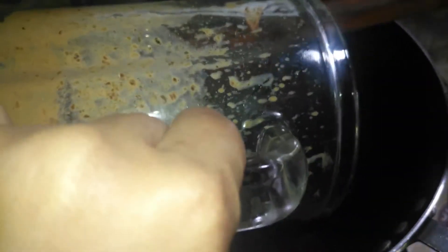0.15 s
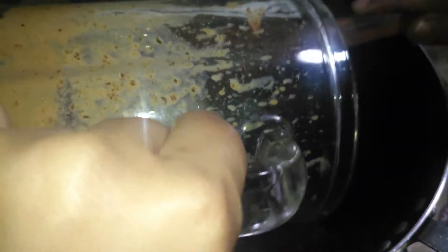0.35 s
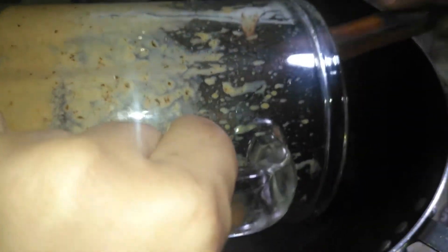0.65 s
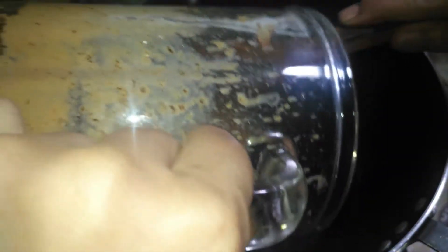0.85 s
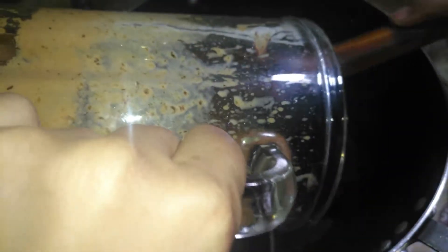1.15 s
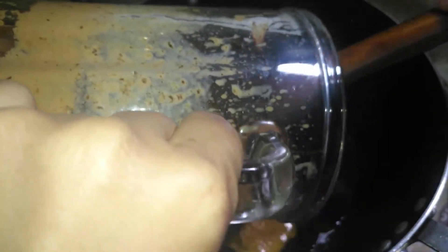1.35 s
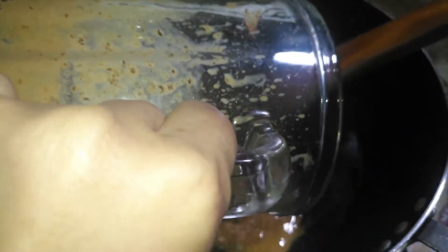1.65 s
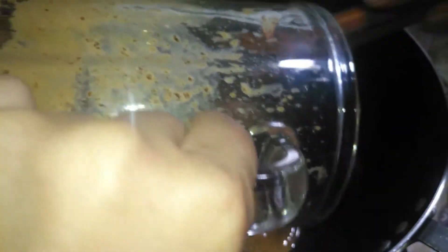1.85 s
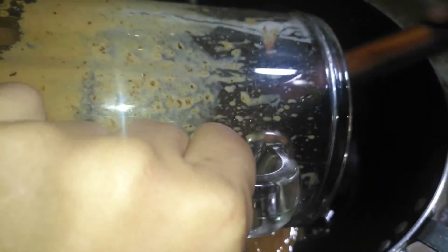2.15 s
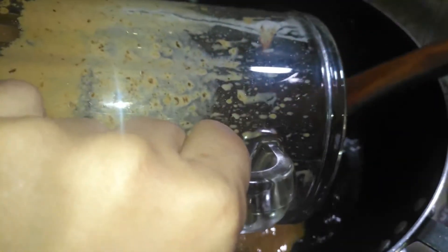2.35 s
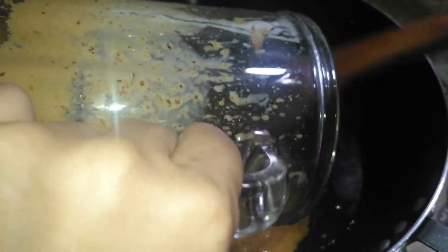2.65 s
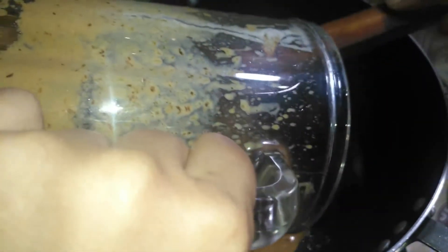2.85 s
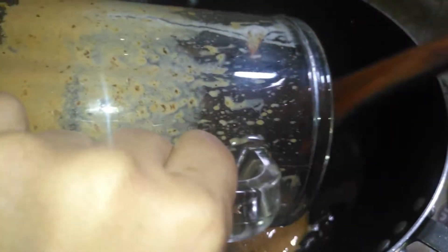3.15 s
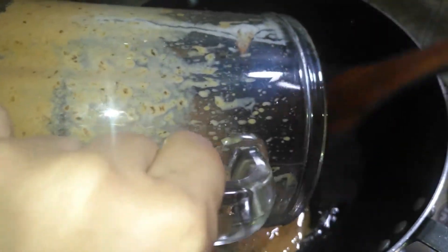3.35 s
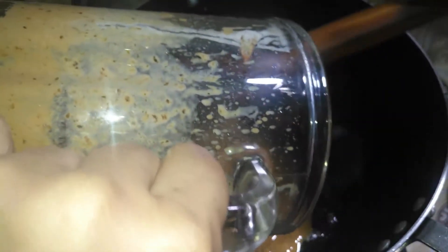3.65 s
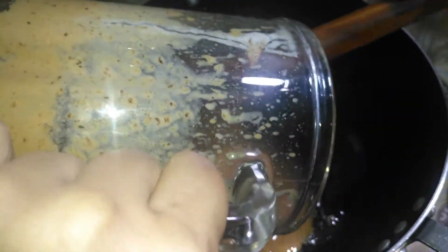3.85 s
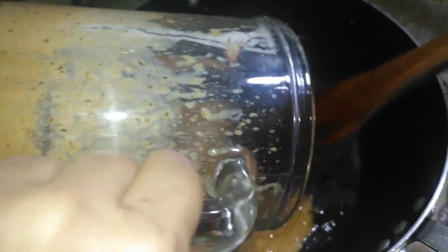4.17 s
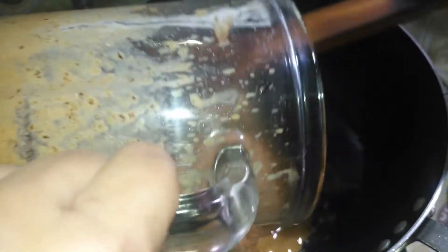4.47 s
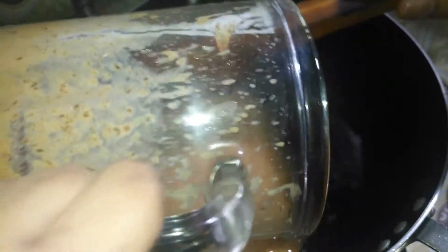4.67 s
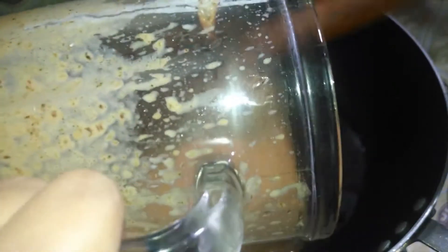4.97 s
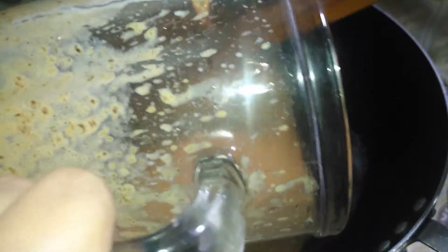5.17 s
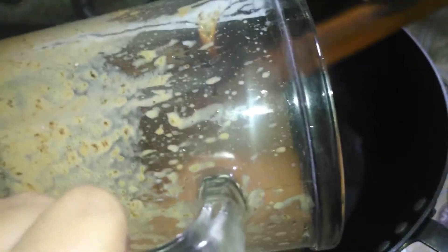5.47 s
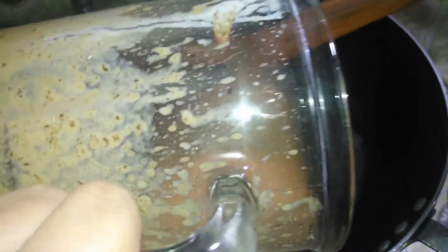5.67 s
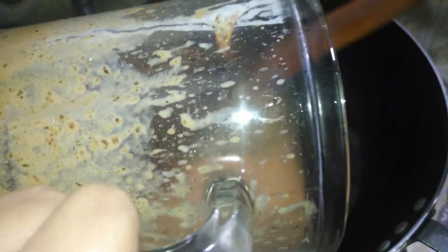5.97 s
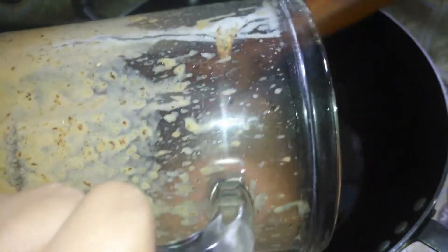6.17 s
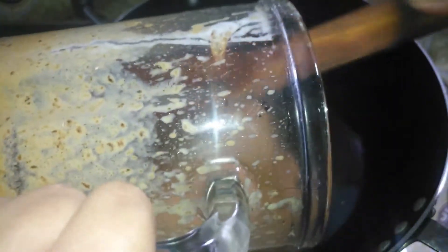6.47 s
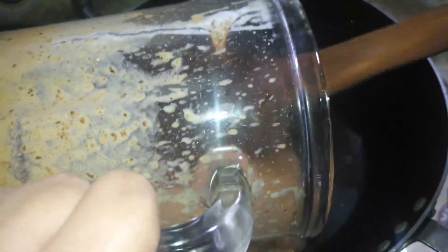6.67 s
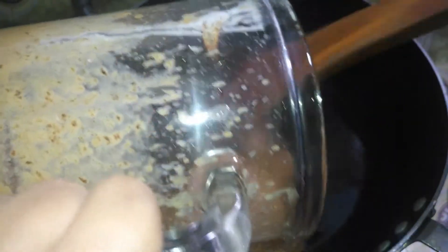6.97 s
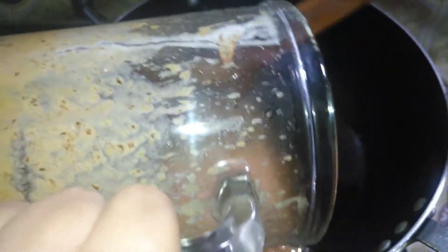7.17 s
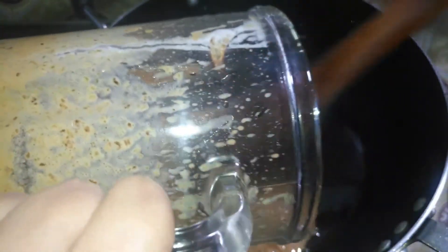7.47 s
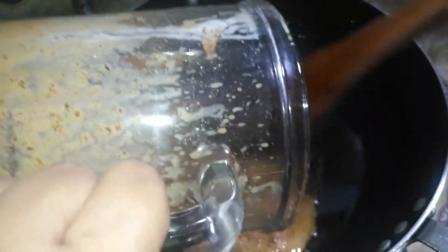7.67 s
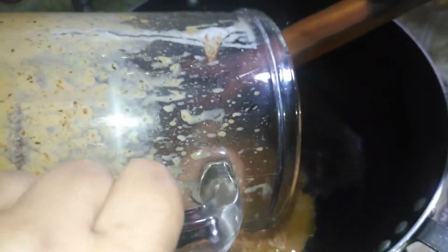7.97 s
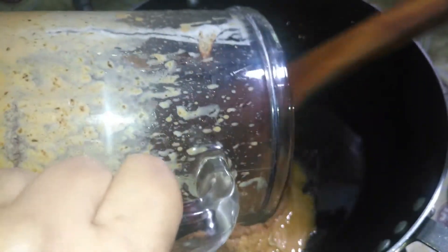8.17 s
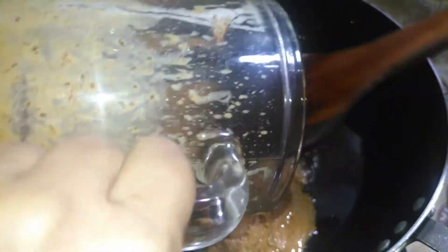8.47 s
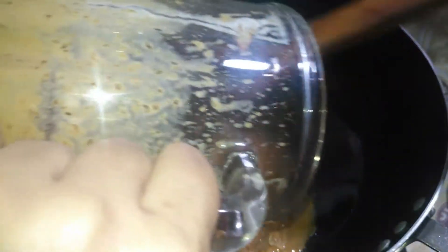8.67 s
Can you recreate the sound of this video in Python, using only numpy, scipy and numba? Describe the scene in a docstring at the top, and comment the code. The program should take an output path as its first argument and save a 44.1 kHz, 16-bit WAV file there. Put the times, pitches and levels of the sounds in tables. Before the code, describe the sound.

A handheld stereo phone, close to the jar and pan, picks up dull, damped glass knocks from a wooden spatula. A bright clack opens, a hollow knock follows, then it is sparse, mostly fine crackling spits and faint frying. Later the taps and low rubbing shudders come more often, peaking in a loud rattle past the middle. Sharp oil pops punctuate them, with short reflections from hard kitchen surfaces and a faint background hum.

```python
"""A small hard kitchen hums faintly under a hot pan: steady coloured noise and tones, with sizzle made of tiny noise bursts.
Almost at once a wooden spatula rubs and knocks inside a tilted glass jar, pushing thick paste into the pan.
Rubs are low shudders and stirred air; knocks ring the jar's air and walls as fading sine waves.
From 0.16 s drops spit in the oil as short filtered noise pops. Knocks bunch up around 6.1 to 6.5 s,
and a last group comes near 8.6 s. Echoes of the knocks and spits follow each one."""
import sys
import numpy as np
from scipy import signal
from scipy.fft import rfft, irfft
from scipy.io import wavfile
from scipy.ndimage import uniform_filter1d
from numba import njit

SR = 44100
rng = np.random.default_rng(int(sys.argv[2]) if len(sys.argv) > 2 else 0)


def to_wav(s):
    """Save 16-bit WAV."""
    ch = np.atleast_2d(s).T  # columns
    pcm = np.round(np.clip(ch, -1, 1) * 32767)  # PCM
    wavfile.write(sys.argv[1], SR, pcm.astype(np.int16))


N = 388962

# steady kitchen background, relative spectrum: f/Hz, level/dB
KITCHEN_COLOUR = [(20, -18), (50, -9), (102, 2), (190, -8.5), (300, -10.5), (400, -5.5), (490, -14.5),
                  (690, -1.5), (800, -12), (1470, -15.5), (2100, -17.5), (2700, -20.5), (5000, -29.5),
                  (8000, -41), (14000, -41)]
# how alike left and right are in the background: f/Hz, correlation (0 to 1)
ALIKE = [(60, 1), (300, 0.6), (700, .05), (2200, 0.56), (4000, .02)]
# appliance tones: f/Hz, level/dB (rms)
HUM = [(247.6, -71.5), (484.5, -84.5), (1405, -93.5), (1647, -91), (2046, -87), (2143, -95.5),
       (2245, -91.5), (2293, -91), (2347, -99.5)]
# fresh paste meets the oil and fries: t/s, length/s, level/dB
FRYING = [(0.0, 0.076, -73), (0.236, 0.027, -72), (1.55, 0.92, -72.5), (2.875, 0.67, -86.5),
          (4.733, 0.64, -81.5), (5.855, 0.033, -75), (6.437, 0.1, -74), (6.997, 0.15, -74),
          (7.421, 0.079, -81.5), (8.37, .3, -85.5), (8.746, 0.089, -78.5)]
# relative spectrum of the sizzle: f/Hz, level/dB
SIZZLE_COLOUR = [(880, -36.5), (1500, -1), (2120, 1), (2700, -8), (4390, -12.5), (5200, 2), (6390, -1),
                 (11600, -20.5), (14000, -38)]
# strokes of the spatula along the glass:
# t/s, length/s, shudder level/dB, shudder f/Hz, stirred air level/dB, deep sway level/dB
STROKES = [(0.026, 0.059, -61, 95.94, -67.5, -61.5), (0.36, 0.032, -83.5, 100.2, -66, -92),
           (0.661, .12, -80.5, 115.2, -53, -88), (1.308, 0.024, -69, 110.5, -87, -70.5),
           (1.598, 0.14, -57.5, 66.47, -94, -65), (1.796, .04, -48.5, 66.47, -77, -65),
           (2.148, .2, -71.5, 98.4, -104, -80), (3.545, .06, -71.5, 98, -82, -72),
           (3.862, .1, -69, 81.62, -93, -73), (4.057, 0.12, -68.5, 79.8, -72.5, -89),
           (4.314, .06, -63, 86.9, -80, -88), (4.6, .05, -68.5, 98.44, -88, -100),
           (4.777, 0.068, -63.5, 101.4, -76, -86), (5.03, 0.13, -71, 97.45, -82, -78),
           (5.377, .04, -62.5, 98.3, -93, -86), (5.55, .07, -62.5, 96.8, -80, -71),
           (5.75, 0.11, -64.5, 104.2, -78, -87), (5.929, 0.12, -60, 90.18, -82, -80),
           (6.184, 0.25, -47.5, 78.25, -79.5, -75.5), (6.476, 0.043, -56, 77.4, -51.5, -91),
           (6.663, .13, -57, 82.67, -72.5, -77), (6.831, 0.029, -54.5, 109.5, -79, -80.5),
           (6.967, 0.071, -59, 104.6, -82, -87.5), (7.192, 0.039, -57.5, 106.5, -72, -86),
           (7.391, 0.11, -52.5, 112.7, -98, -84), (7.651, 0.042, -55, 110.5, -77, -82),
           (7.866, 0.067, -59.5, 106.9, -78, -84), (8.066, 0.038, -59.5, 113.7, -75, -80),
           (8.38, 0.022, -71.5, 118.2, -71, -88), (8.515, 0.013, -47.5, 108.6, -61, -52.5),
           (8.634, 0.13, -48.5, 111.3, -51, -49.5)]
# the held jar between strokes: shudder level/dB, shudder f/Hz, stirred air level/dB, deep sway level/dB
HELD_JAR = (-80.5, 105, -89, -93)
# spatula blows on the jar: t/s, then for air, low wall and high wall in turn favoured f/Hz and level/dB,
# top wall level/dB, ring of low and high walls as a share of their t60 (at least 0.1 is used),
# left minus right level/dB
KNOCKS = [(0.026, 526, -16.5, 1170, -14.5, 1973, -12.5, -12.5, 0.46, 1.5),
          (0.047, 547, -25.5, 1260, -31, 2260, -41.5, -45.5, 0.72, -11.5),
          (0.156, 576, -38, 1080, -76, 1820, -42.5, -46, 0.26, 7),
          (0.174, 400, -41, 1390, -60, 2230, -63.5, -65, 0.35, 6),
          (0.247, 443, -28, 1250, -23.5, 1736, -28.5, -28.5, 0.24, 1.5),
          (0.265, 543, -28.5, 1500, -46, 1570, -61, -69, 0.4, -7.5),
          (0.644, 557, -51, 1330, -59.5, 2130, -59, -48, 0.94, 7.5),
          (0.7, 545, -43, 1290, -70, 1890, -73.5, -70, .37, 8),
          (0.823, 509, -18, 1000, -70, 1550, -71, -63, .46, 1.5),
          (1.607, 458, -47.5, 1160, -80, 1680, -81, -64, .4, 5),
          (1.824, 508, -34, 1130, -35.5, 1780, -57, -70, 0.37, 6),
          (2.736, 463, -43, 1110, -56, 1860, -54, -55.5, 0.55, 6),
          (3.628, 464, -35.5, 1040, -43, 2050, -63, -75, 0.26, 5.5),
          (4.04, 450, -30, 1240, -43, 1630, -56, -57, 0.61, 3),
          (4.112, 530, -59, 1280, -46, 1650, -48, -45.5, 0.42, 1),
          (4.128, 490, -55, 1400, -58, 2200, -57, -52, 0.48, 8),
          (4.142, 490, -69, 1190, -59, 1900, -55.5, -59, 0.44, -1),
          (4.538, 506, -40.5, 1440, -61, 1660, -60.5, -68, 0.39, 3.5),
          (4.569, 477, -47.5, 1350, -50.5, 1620, -49, -59, 0.5, -7),
          (4.954, 532, -26, 1360, -32.5, 1690, -26, -34.5, 0.58, 1.5),
          (5.16, 491, -24.5, 1290, -22, 1560, -65, -62.5, 0.2, 4.5),
          (5.241, 486, -28, 1430, -17, 2330, -26, -36, 0.18, 3),
          (5.667, 440, -38.5, 1350, -40, 1640, -38.5, -66, 0.24, 3),
          (5.717, 486, -30.5, 1280, -31.5, 1550, -41, -45.5, 0.44, -1.5),
          (5.824, 510, -33, 1130, -22, 2330, -24.5, -29.5, 0.19, 2.5),
          (6.104, 484, -40.5, 1230, -54.5, 1730, -68.5, -63.5, 0.35, 6),
          (6.179, 532, -43, 1350, -19, 1680, -27, -32.5, 0.16, -5.5),
          (6.189, 515, -48, 1280, -23, 1907, -23, -33.5, 0.21, 1.5),
          (6.215, 507, -28.5, 1230, -39, 1690, -40, -36, 0.94, 7),
          (6.414, 468, -37, 1120, -40, 1720, -38, -33.5, .48, 3),
          (6.423, 538, -20.5, 1000, -13.5, 2370, -24, -19, 0.4, 7),
          (6.442, 465, -21, 1270, -2.5, 1807, -5, -11.5, 0.34, 0),
          (6.486, 493, -32, 1210, -25.5, 1800, -32.5, -45.5, 0.94, 1),
          (6.507, 500, -50, 1247, -24, 1750, -48, -40, 1, -1),
          (6.799, 478, -36, 1340, -25, 1630, -31.5, -48, 0.73, -7.5),
          (7.104, 463, -23.5, 1130, -16.5, 1710, -21.5, -29, 0.34, 1),
          (7.709, 459, -45.5, 1240, -55.5, 1610, -77, -73.5, 0.48, 6),
          (7.871, 459, -39.5, 1030, -53.5, 2150, -77, -68, .4, 2.5),
          (8.099, 481, -50.5, 1020, -59, 2050, -71, -76, 0.31, 7.5),
          (8.508, 460, -29.5, 1350, -19, 2020, -33, -59, 0.38, -3.5),
          (8.66, 437, -21.5, 1140, -55, 1860, -29.5, -31, 0.3, 0.6),
          (8.681, 446, -25.5, 1220, -29.5, 1820, -35.5, -27, 0.63, 2),
          (8.702, 433.5, -28.5, 1250, -70, 1790, -40.5, -39.5, 0.5, -4.5)]
# ways the jar can ring, before the hand and paste shorten them: f/Hz, relative level/dB, t60/s
AIR_MODES = [(420, 5.5, 0.086), (461.8, 5, 0.11), (512, 2, 0.1), (535, 7.5, 0.055), (647, 3, 0.07)]  # air in the jar's mouth
LOW_WALL_MODES = [(994, 0.027, 0.057), (1136.6, 0, 0.046), (1167, 0.0025, 0.048), (1292.4, 0.0066, 0.1),
                  (1344.6, 0, 0.25), (1330, 0.0064, 0.055)]
HIGH_WALL_MODES = [(1527, 0.024, 0.14), (1639, 0.042, 0.097), (1830, 0.015, 0.081), (2060, 0.011, 0.054),
                   (2104, 0.028, 0.2), (2100, 0.005, .07), (2370, 0.023, 0.072)]
TOP_WALL_MODES = [(2668, 5.5, 0.076), (2920, 0.5, 0.084), (3274, 4, 0.11), (3930, 7, 0.12), (4150, 5, .03)]
# drops bursting in hot oil: t/s, peak level/dB, f/Hz, sharpness Q (at least 0.5 is used),
# starting level of the hiss against the burst/dB
SPITS = [(0.1553, -41.5, 3940, 0.59, -34), (0.6427, -54.5, 5300, 2, -12.5), (1.3162, -73, 5690, 4.1, -9),
         (1.482, -66, 7000, 0.56, -25), (1.55, -59, 5420, 2.1, 1), (1.6716, -57.5, 6600, 1.9, 3),
         (1.9136, -54.5, 5700, 2.7, -20), (1.953, -60.5, 6300, 0.86, -31), (1.9832, -57.5, 6500, 0.97, -34),
         (2.0643, -54, 5940, 2.6, -25.5), (2.2897, -55.5, 5900, 1.1, -12), (2.4672, -51.5, 5540, .88, -19),
         (2.667, -65, 5020, 2.4, -17), (2.8709, -63, 5000, 2, -19), (2.9487, -67, 10700, 2, -21),
         (2.9763, -66, 10900, 2.5, -18), (3.048, -58, 5700, 1.2, -17), (3.0894, -54.5, 3440, 0.7, -43.5),
         (3.201, -53.5, 4694, 1.9, -21), (3.242, -48, 6400, 2.3, -20), (3.3054, -46, 5950, 3, -31),
         (3.467, -53.5, 6800, 1.3, -18), (3.7768, -54.5, 7400, 1.14, -9.5),
         (3.8513, -50.5, 6910, 0.44, -45), (4.0396, -62.5, 6350, 1.2, -13), (4.1713, -56, 11670, 0.46, -53),
         (4.2134, -57.5, 3520, 1.6, -22), (4.4348, -61, 5300, 0.47, -15), (4.744, -37.5, 5700, 4.4, -26),
         (5.034, -65, 12450, 2.5, -21), (5.0509, -50.5, 9300, 3.4, -43), (5.1476, -48.5, 9000, 0.76, -36),
         (5.1752, -35.5, 5300, 2.3, -24), (5.3697, -66.5, 4570, 2.8, -25), (5.428, -44, 6400, 1.1, -36.5),
         (5.8222, -45, 3330, 2.3, -31), (5.937, -45.5, 5500, 0.96, -41.5),
         (6.4101, -39.5, 3365, 2.1, -27.5), (6.8386, -63.5, 7500, 1.4, -18),
         (6.9735, -43.5, 5520, 1.8, -29.5), (7.197, -63, 6055, 2.14, -25), (7.3262, -58.5, 7740, 0.94, -11),
         (7.4031, -33, 5630, 5.2, -25.5), (7.9708, -63, 5480, 2.6, -10), (8.0312, -62, 5440, 1.47, -25),
         (8.099, -54, 6180, 2.33, -41), (8.3299, -40, 3505, 1.24, -16.5), (8.6133, -59, 10400, 1.47, -12)]
# echo bands: f/Hz, t60/s, echo over direct sound/dB before the 4-fold (12 dB) boost in room()
ECHO_BANDS = [(283, 0.47, -21.5), (600, 0.13, -9.5), (1340, 0.14, -21.5), (2360, 0.48, -22.5),
              (5590, 0.12, -25), (11000, 0.29, -21.5)]

KITCHEN_DB = -71  # rms of the part shared by both channels, before its slow drift
FRY_RISE_DB_S, FRY_FALL_DB_S, SIMMER_DB = 295.5, 150.5, -99
STROKE_RISE_DB_S, STROKE_FALL_DB_S = 252.5, 204
AIR_RING, TOP_RING = 0.81, 0.2  # share of their t60 that the paste leaves to air and top wall modes
WANDER_RAD = 0.35  # size of the random phase steps, before smoothing
CRACK_DB, CRACK_S = -13, 0.0025  # noise before its filter, against the top wall level; fade time
SKID_DB, SKID_S = -1.5, 0.0029  # later contacts against the first; fade time
RATTLE_DB, RATTLE_S = -30, 0.028  # noise before its filter, against the force of the blow; fade time
HARD_RATTLE_DB = 11  # hard contacts, strong in the top modes, rattle more
SPIT_LEFT_DB, SPIT_LEFT_DB_PER_OCTAVE = 9.5, 2  # left minus right at 6300 Hz, growing with pitch
ECHO_WIDTH = 0.33  # unlike share of the echo
TOP_HZ = 14180  # upper limit of the phone


def undb(db):
    """Turns decibels into gain."""
    return 10 ** (np.asarray(db) / 20)


def unit(x):
    """Scales a signal to rms 1."""
    return x / np.sqrt(np.mean(x ** 2))


def along(table, hz):
    """Reads between (Hz, value) points, with pitch on a log scale."""
    f, value = np.transpose(table)
    return np.interp(np.log(np.maximum(hz, 1)), np.log(f), value)


def coloured(table):
    """Makes noise with a spectrum of (Hz, dB) points."""
    colour = undb(along(table, np.fft.rfftfreq(N, 1 / SR)))
    return irfft(rfft(rng.standard_normal(N)) * colour, N)


def walk(rate):
    """Makes a smooth random wander of rms 1 from about `rate` new values a second."""
    k = int(SR / rate)
    held = np.repeat(rng.standard_normal(N // k + 1), k)
    smooth = uniform_filter1d(uniform_filter1d(held, k), k)
    return unit(smooth[:N])


@njit
def svf(x, hz, q):
    """Band-pass filter whose centre may move; gain is 1 at the centre."""
    y, band, low = np.empty(len(x)), 0., 0.
    for i in range(len(x)):
        g = np.tan(np.pi * hz[i] / SR)
        v = (band + g * (x[i] - low)) / (1 + g * (g + 1 / q))
        band, low, y[i] = 2 * v - band, low + 2 * g * v, v / q
    return y


def add(out, s, sound, left_db):
    """Mixes a sound into both channels at time s; left_db is left minus right."""
    i = int(s * SR)
    n = min(sound.shape[-1], N - i)
    out[:, i:i + n] += sound[..., :n] * undb([[left_db / 2], [-left_db / 2]])


def swells(start_s, length_s, rise_db_s, fall_db_s):
    """One gain row per event, a value every 64 samples: a steady rise in dB, a hold, a steady fall."""
    t = np.arange(0, N, 64) / SR
    early = np.maximum(start_s[:, None] - t, 0)
    late = np.maximum(t - (start_s + length_s)[:, None], 0)
    return undb(-rise_db_s * early - fall_db_s * late)


def spread(x):
    """Fills in from one value every 64 samples to one per sample."""
    return np.interp(np.arange(N), 64 * np.arange(len(x)), x)


def kitchen():
    """Steady background noise plus appliance tones; the bass is alike left and right."""
    hz = np.fft.rfftfreq(N, 1 / SR)
    alike = np.clip(along(ALIKE, hz), 0, 1)
    mid = irfft(rfft(coloured(KITCHEN_COLOUR)) * np.sqrt(1 + alike), N)
    side = irfft(rfft(coloured(KITCHEN_COLOUR)) * np.sqrt(1 - alike), N)
    air = np.array([mid + side, mid - side]) * undb(KITCHEN_DB) / np.std(mid)
    t = np.arange(N) / SR
    tones = 0
    for f, db in HUM:
        level = np.sqrt(2) * undb(db + 0.3 * walk(2.9))
        tones = tones + level * np.sin(2 * np.pi * f * t + 0.6 * walk(39))
    return air * undb(0.9 * walk(1.0)) + tones


def sizzle():
    """Hundreds of tiny bursts a second of uneven size over a fine hiss, stronger on the left."""
    s, length, db = np.transpose(FRYING)
    frying = undb(db) @ swells(s, length, FRY_RISE_DB_S, FRY_FALL_DB_S)
    gain = spread(undb(SIMMER_DB) + frying)
    size = undb(2.0 * rng.exponential(size=N).clip(0, 4))
    size = size * (rng.random(N) < 400 / SR)  # about 400 bursts a second
    size = signal.lfilter([1], [1, -np.exp(-1 / (0.0016 * SR))], size)  # each fades over 1.6 ms
    strength = unit(size) + 1.5  # the constant part is the fine hiss
    colour = undb(along(SIZZLE_COLOUR, np.fft.rfftfreq(N, 1 / SR)))
    grains = [unit(irfft(rfft(strength * rng.standard_normal(N)) * colour, N)) for _ in range(2)]
    return np.array(grains) * gain * undb(2 * walk(36)) * undb([[3.5], [-3.5]])


def drag():
    """The blade sticks and slips: the held jar shudders low and the air inside is stirred."""
    s, length, low_db, pitch_hz, air_db, sway_db = np.transpose(STROKES)
    rest_low_db, rest_hz, rest_air_db, rest_sway_db = HELD_JAR
    press = swells(s, length, STROKE_RISE_DB_S, STROKE_FALL_DB_S)
    low = undb(rest_low_db) + undb(low_db) @ press
    stir = undb(rest_air_db) + undb(air_db) @ press
    sway = undb(rest_sway_db) + undb(sway_db) @ press

    # average pitch weighted by power, so the strongest stroke sets it
    rest_power, power = undb(2 * rest_low_db), undb(2 * low_db)
    pitch_sum = rest_power * rest_hz + power * pitch_hz @ press ** 2
    hz = spread(pitch_sum / (rest_power + power @ press ** 2))

    push = rng.standard_normal(N)
    steady = np.sqrt(2) * np.sin(2 * np.pi * np.cumsum(hz * (1 + 0.02 * walk(25))) / SR)
    ragged = unit(svf(svf(push, hz, 2.5), hz, 1.2))
    shudder = (steady + undb(-1.0) * ragged) * spread(low) * undb(1.5 * walk(10))
    deep = svf(svf(push[::-1].copy(), np.full(N, 50.), 1.6), np.full(N, 46.), 3.8)
    shudder += unit(deep) * spread(sway)
    aside = undb(-12.0) * np.roll(shudder, 150)  # the two microphone ports feel it a little differently

    slips = rng.standard_normal(N) * undb(3.4 * walk(40))
    air_hz = np.full(N, 530.)
    air = unit(svf(svf(slips, air_hz, 6.), air_hz, 6.)) * spread(stir)
    return np.array([shudder + aside, shudder - aside]) + air * undb([[1.5], [-1.5]])


def ring(modes, favoured_hz, db, length, reach, rise_s):
    """Fading sine waves: the spot struck favours some pitches, hand and paste set how long they last."""
    t = np.arange(SR // 3) / SR
    hz, mode_db, t60 = np.transpose(modes)[:, :, None]
    gain = undb(mode_db) * (1 + (np.log(hz / favoured_hz) / reach) ** 2) ** -1
    gain = gain / np.sqrt(np.sum(gain ** 2))
    loaded_hz = hz * (1 + 0.014 * rng.standard_normal(hz.shape))  # clinging paste shifts each mode a little
    # each mode reaches the two microphone ports from its own patch of glass
    lead = 0.00028 * hz * rng.standard_normal(hz.shape) * np.array([1, -1])[:, None, None]
    # sliding paste blurs every ring: the phase drifts by a random step every 50 samples
    steps = WANDER_RAD * rng.standard_normal((len(hz), len(t) // 50)).cumsum(axis=1)
    lead = lead + uniform_filter1d(np.repeat(steps, 50, axis=1), size=50)
    fade = np.exp(-np.log(1000) * t / (t60 * max(length, 0.1)))
    waves = gain * fade * np.sin(2 * np.pi * loaded_hz * t + lead)
    return undb(db) * waves.sum(1) * (1 - np.exp(-t / rise_s)) ** 2


def knocks():
    """Each blow rattles the wood, cracks on the glass and rings the air and the walls."""
    out, t = np.zeros((2, N)), np.arange(SR // 3) / SR
    bright = signal.butter(2, [2000, 5500], "band", fs=SR, output="sos")
    woody = signal.butter(3, [900, 4200], "band", fs=SR, output="sos")
    for s, air_hz, air_db, low_hz, low_db, high_hz, high_db, top_db, wall_ring, left_db in KNOCKS:
        walls = ring(LOW_WALL_MODES, low_hz, low_db, wall_ring, reach=0.018, rise_s=0.00065)
        walls += ring(HIGH_WALL_MODES, high_hz, high_db, wall_ring, reach=0.045, rise_s=0.00025)
        walls += ring(TOP_WALL_MODES, 2200, top_db, TOP_RING, reach=0.24, rise_s=0.00056)
        crack = signal.sosfilt(bright, rng.standard_normal(len(t)) * np.exp(-t / CRACK_S))
        walls += undb(top_db + CRACK_DB) * crack

        # the blade lands, then skids: a first contact and a spray of smaller ones
        skid = rng.standard_normal(SR // 20) ** 3 * np.exp(-t[:SR // 20] / SKID_S)
        skid = undb(SKID_DB) * skid / np.linalg.norm(skid)
        skid[0] = 1
        skid = skid / np.linalg.norm(skid)
        blow = signal.fftconvolve(walls, skid[None], axes=1)[:, :len(t)]

        # too many modes to tell apart: handle, rim and pan shake as a short rough noise
        force = np.linalg.norm(undb([low_db, high_db, top_db + HARD_RATTLE_DB]))
        rattle = signal.sosfilt(woody, rng.standard_normal((2, len(t))) * np.exp(-t / RATTLE_S))
        blow += force * undb(RATTLE_DB) * rattle
        air = ring(AIR_MODES, air_hz, air_db, AIR_RING, reach=0.021, rise_s=0.0022)
        add(out, s, blow + air, left_db)
    return out


def spits():
    """A steam bubble bursts around its pitch; droplets fall back and hiss for a moment."""
    out, t = np.zeros((2, N)), np.arange(SR // 4) / SR
    for s, db, hz, q, hiss_db in SPITS:
        pitch, q = np.full(len(t), 1. * hz), max(1. * q, 0.5)
        burst = np.exp(-t / 0.0022) + undb(hiss_db) * np.exp(-t / 0.046)
        pop = svf(svf(rng.standard_normal(len(t)) * burst, pitch, q), pitch, q)
        click_noise = rng.standard_normal(len(t)) * np.exp(-t / 0.00067)
        click = svf(click_noise, 1.3 * pitch.clip(0, 9000), 1.0)
        # the pan sits left; the phone shades the treble more
        left_db = SPIT_LEFT_DB + SPIT_LEFT_DB_PER_OCTAVE * np.log2(hz / 6300.0)
        add(out, s, undb(db) * (pop / np.abs(pop).max() + undb(-13) * click), left_db)
    return out


def room(dry):
    """Tiles and cupboards: dense echoes that die band by band, partly unlike in the two channels."""
    t = np.arange(SR // 2) / SR
    tail = 0
    for hz, t60, db in ECHO_BANDS:
        centre = np.full(len(t), 1. * hz)
        mid, side = (unit(svf(rng.standard_normal(len(t)), centre, 1.2)) for _ in range(2))
        bands = mid + ECHO_WIDTH * np.array([side, -side])
        balance = np.sqrt(2 * np.log(1000) * hz / t60) / SR  # evens out bandwidth and length
        tail = tail + bands * undb(db - 60 * t / t60) * balance
    tail = 4 * tail * np.clip(t / 0.0056, 0, 1)  # the first walls are a metre or two away
    return signal.fftconvolve(dry, tail, axes=1)[:, :N]


def scene():
    """Knocks and spits sound in the room; jar and pan each have their own share of echo."""
    near, far = knocks(), spits()
    echo = room(near + undb(6.0) * far)
    return near + far + echo + sizzle() + drag() + kitchen()


def record(dry):
    """The phone cuts the top: a steep filter removes what lies above TOP_HZ."""
    return signal.sosfilt(signal.ellip(8, 0.2, 60, TOP_HZ, fs=SR, output="sos"), dry)


dry = scene()
out = record(dry)
to_wav(out)
```